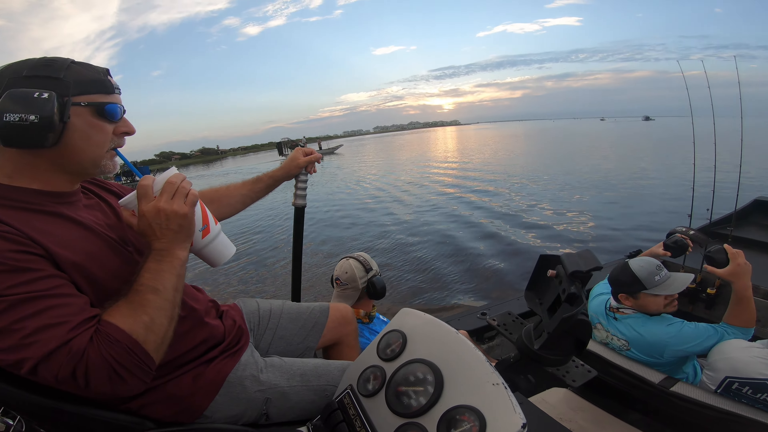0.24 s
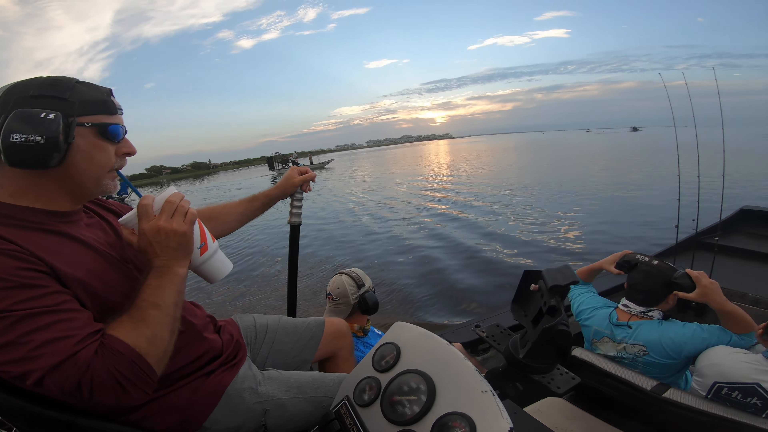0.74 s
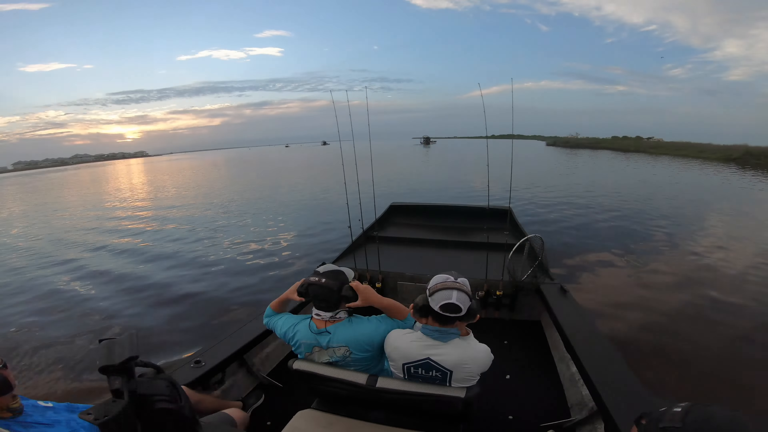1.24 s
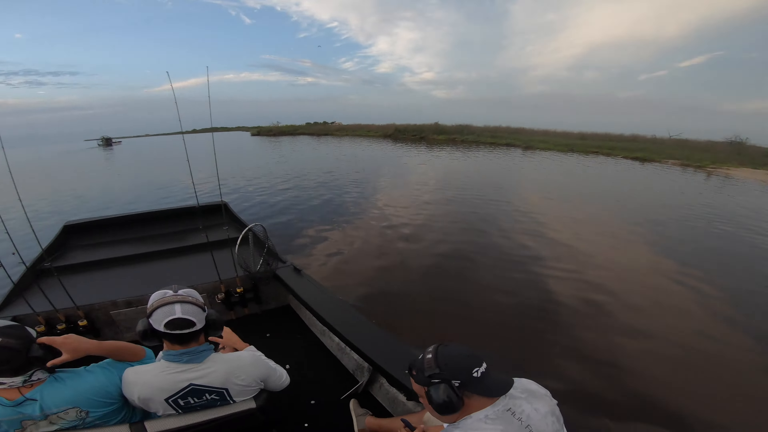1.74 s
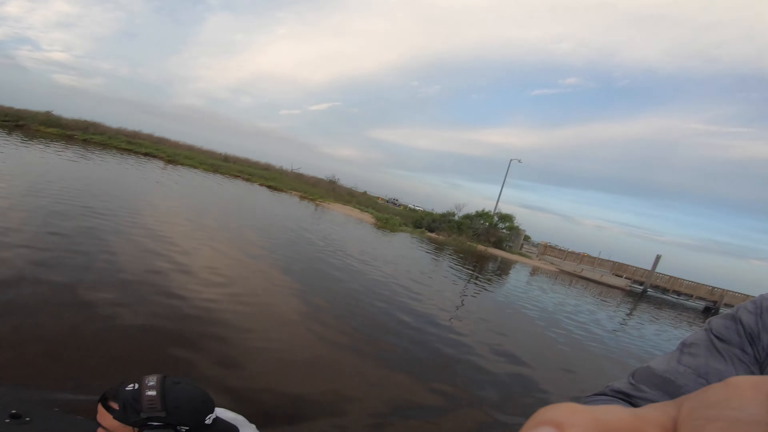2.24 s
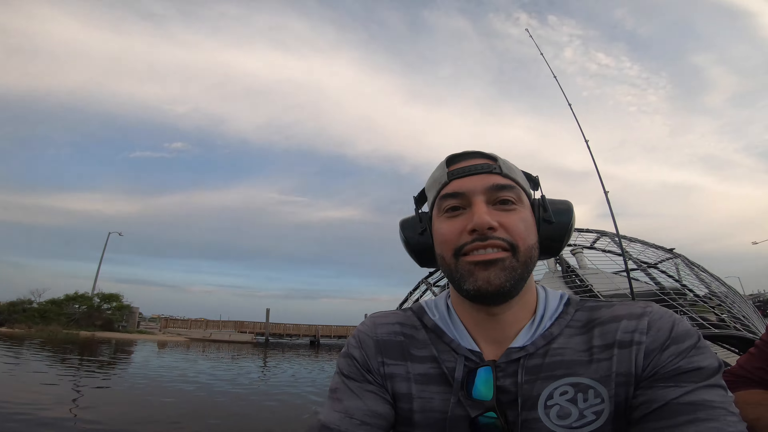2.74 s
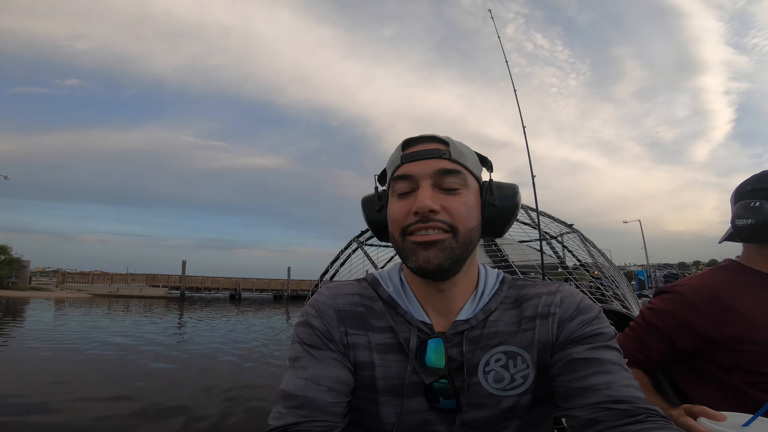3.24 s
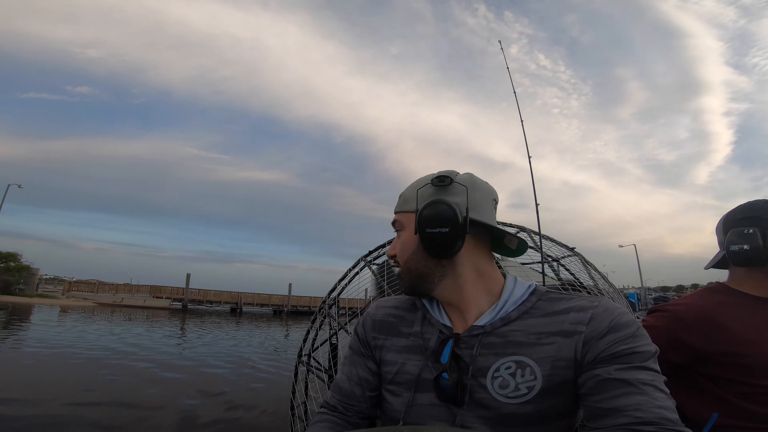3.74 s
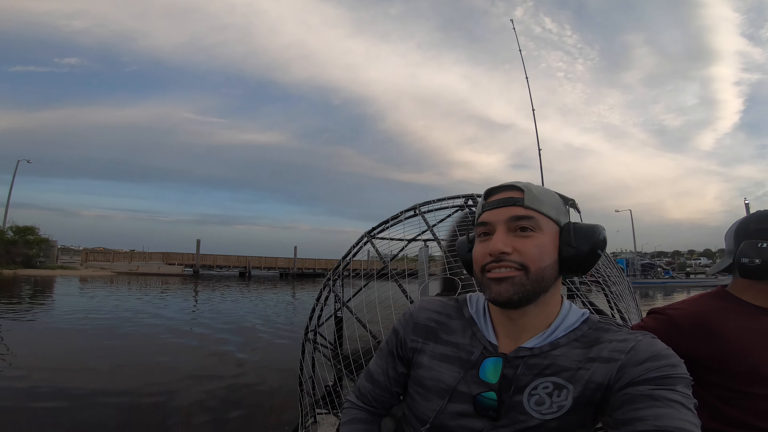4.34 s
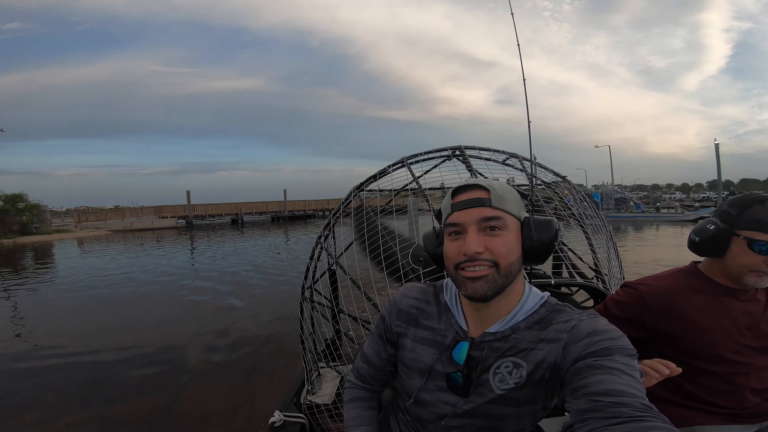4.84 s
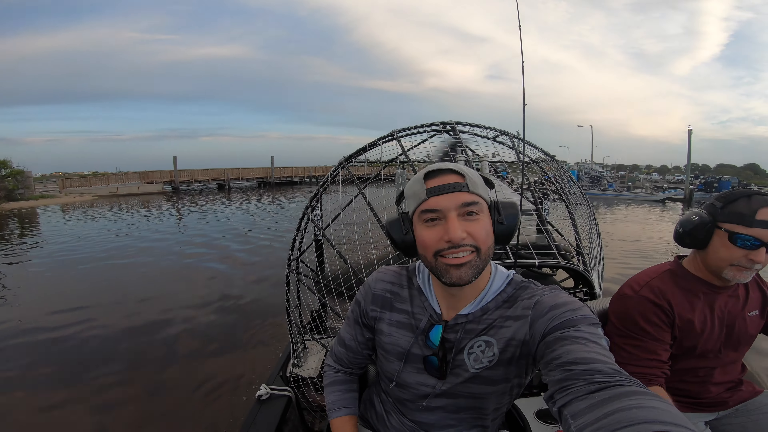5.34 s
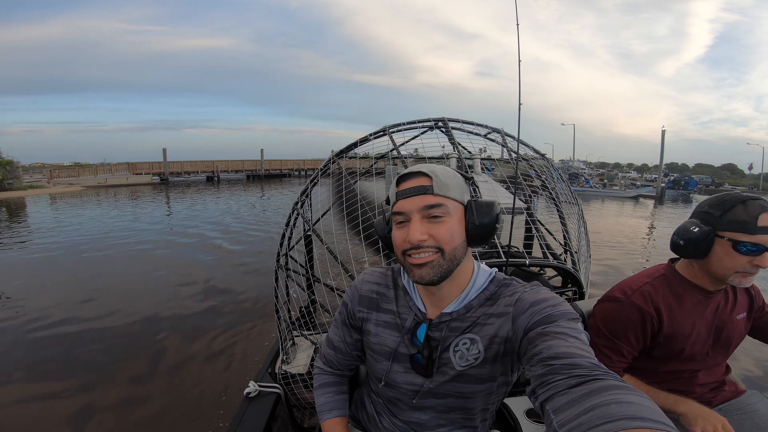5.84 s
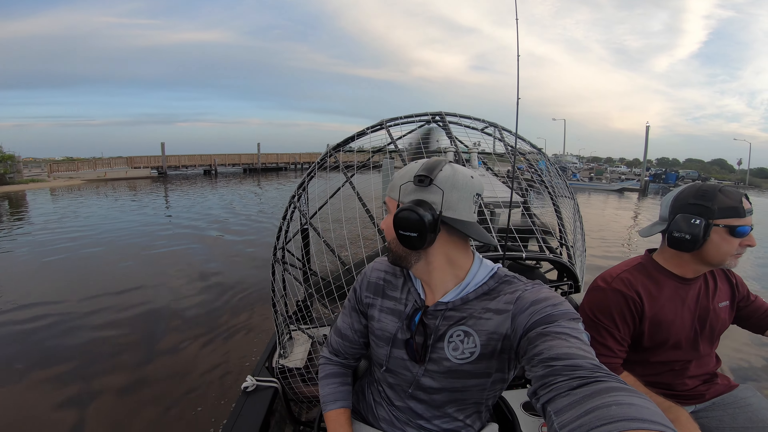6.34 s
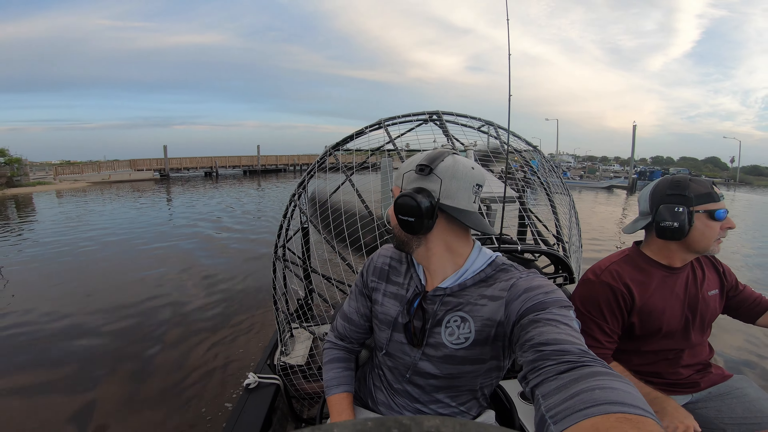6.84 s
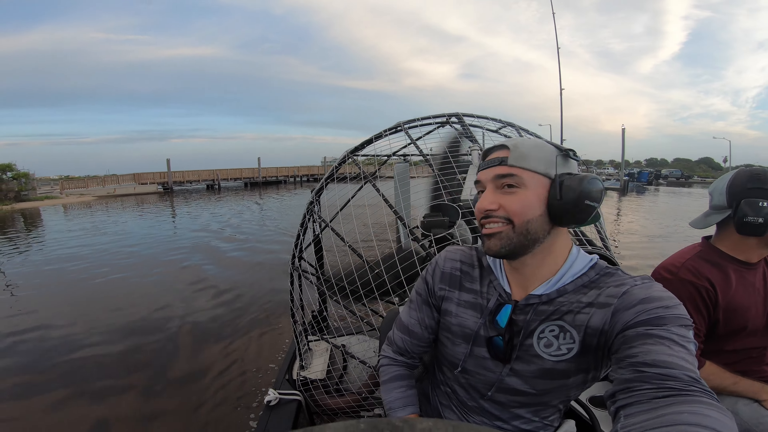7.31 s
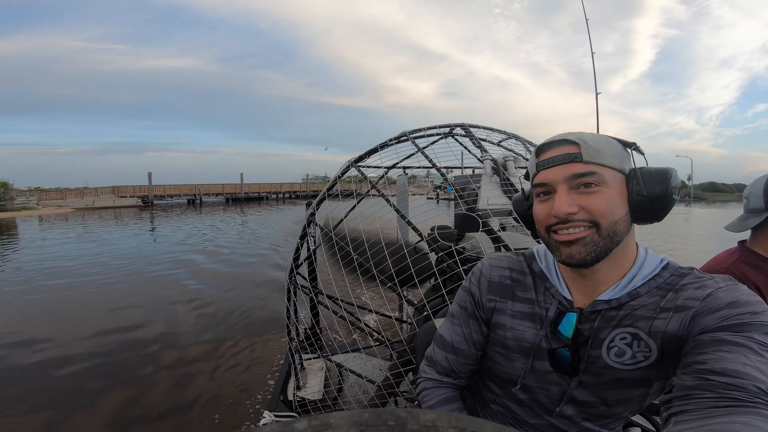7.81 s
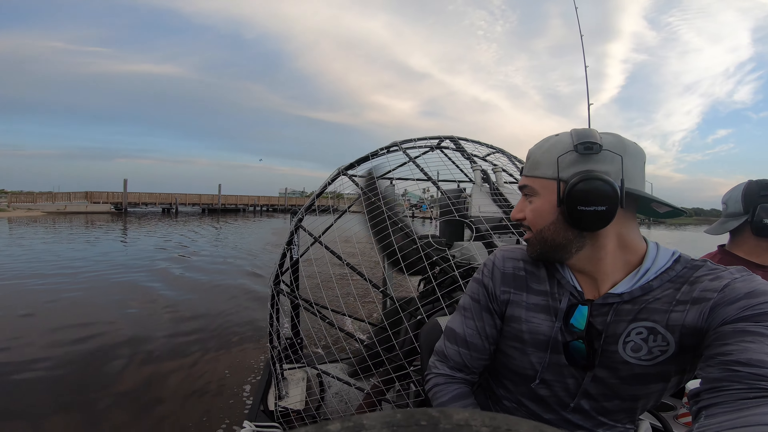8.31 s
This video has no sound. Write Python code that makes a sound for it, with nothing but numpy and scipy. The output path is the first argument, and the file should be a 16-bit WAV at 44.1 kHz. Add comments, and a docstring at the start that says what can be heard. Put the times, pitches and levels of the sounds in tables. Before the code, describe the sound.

Close, dry outdoor stereo from an airboat seat: a continuous low engine hum, burbling exhaust and fast fluttering propeller thuds, with no real change of speed. Over them, a breathy, high whistle flares twice per propeller turn, mostly sliding down. As the handheld microphone turns, the whistle leans right, dulls briefly behind the holder's body, then returns with brighter hiss facing the propeller. One tiny tap on the camera case.

```python
"""Airboat cruising over calm water

Heard from the seats by a hand-held camera that swings from the port side past the bow to face the stern.
The V8 exhaust is a drone of sine lines over pulsing rumble; the geared-down four-blade propeller
adds thudding sine lines and chopped noise. One blade whistles: a hoarse gliding tone, mostly falling in
pitch, flares twice a turn. Bands of noise give the air, engine and cage hiss; a finger taps the case once."""
import sys
import numpy as np
from scipy import signal
from scipy.fft import rfft, irfft, next_fast_len
from scipy.io import wavfile
from scipy.ndimage import map_coordinates

SR = 44100
rng = np.random.default_rng(int(sys.argv[2]) if len(sys.argv) > 2 else 0)


def master_out(mix):
    """Clip the mix to full scale and print it as 16-bit PCM to the path in sys.argv[1]."""
    frames = np.transpose(np.atleast_2d(mix))
    ceiling = np.clip(frames, -1, 1)
    pcm = np.round(ceiling * 32767).astype(np.int16)
    wavfile.write(sys.argv[1], SR, pcm)


N = 377937  # length [samples]

# engine speed: (time [s], crank speed [revolutions per minute])
ENGINE_SPEED = [(0, 1425), (1.2, 1429.5), (2.5, 1427), (3.3, 1434), (6.6, 1438), (7.3, 1451), (8.57, 1441)]
GEAR_RATIO = 2.339  # crank turns per propeller turn
# where the camera points: (time [s], bearing of the stern leftwards from the lens [degrees],
# share of the propeller hidden by the holder's body [0-1])
CAMERA_SWING = [(0, 80, 0), (.85, 100, 0), (1.45, 182, 0), (2.3, 262, 0), (2.75, 300, .7), (3.9, 325, 1),
                (5.35, 343, 0), (8.57, 343, 0)]
# how alike left and right are in the noises: (frequency [Hz], correlation [-1 to 1])
STEREO_LIKENESS = [(30, 0.28), (100, 0.71), (350, 1), (700, 0.77), (1300, 0.44), (2800, 0.86), (4000, 1),
                   (5000, 0.68), (6500, 0.18), (8300, 0.14), (10000, 0.08), (14000, 0.18)]

# exhaust lines beside the firing note, before surging: (multiple of crank speed [ratio], level [dB])
EXHAUST_LINES = [(2.5, -50), (3.5, -59), (4.5, -32), (5, -44), (5.5, -40), (6.5, -42.5), (7, -33),
                 (7.5, -43), (8, -36.5), (8.5, -38), (9.5, -42), (11, -44), (12.5, -45), (14.5, -46.5),
                 (15.5, -42.5)]
# exhaust line at 12 per crank turn: (time [s], level [dB])
BLARE_LEVEL = [(0, -41), (.55, -33), (.8, -40), (1.4, -39), (1.75, -33.5), (2.2, -35.5), (3.35, -30.5),
               (4.08, -44), (4.3, -24.5), (4.52, -38), (4.64, -28), (5.4, -28.5), (5.8, -32), (6.15, -38),
               (6.35, -30), (7.1, -32), (7.35, -40), (8.1, -38), (8.42, -30.5)]
# exhaust line at 10.5 per crank turn: (time [s], level [dB])
GROWL_LEVEL = [(0, -38), (.65, -33), (1.2, -39), (2.9, -37), (4, -45), (5.3, -39), (5.6, -33.5),
               (6.45, -33.5), (7, -44), (7.45, -33.5), (8.5, -30.5)]
# colour of the exhaust rumble: (frequency [Hz], relative density [dB per Hz])
RUMBLE_SPECTRUM = [(15, -48), (30, -36), (55, 0), (80, 4.5), (130, -7), (180, -2.5), (300, -8), (500, -24),
                   (900, -60)]

# propeller lines, before they follow the chop: (multiple of blade rate [ratio], level [dB])
BLADE_LINES = [(1, -40.5), (2, -38.5), (3, -38.5), (4, -40), (5, -43.5), (6, -41.5), (8, -40), (9, -44.5),
               (10, -42.5), (11, -42.5), (12, -48), (13, -46.5), (14, -49), (15, -48.5), (16, -52)]
# the propeller's chop: (time [s], level [dB])
CHOP_LEVEL = [(0, -27), (.6, -26), (1.15, -30.5), (1.8, -27), (2.3, -29), (2.8, -26.5), (3.35, -27.5),
              (3.95, -30.5), (4.45, -30), (4.68, -24.5), (4.9, -31), (5.5, -26), (5.85, -28), (6.45, -27),
              (7.1, -28), (8.4, -26.5)]
# colour of the chop: (frequency [Hz], relative density [dB per Hz])
CHOP_SPECTRUM = [(90, -48), (160, 6.5), (260, -1), (400, 1.5), (600, -3.5), (900, -13), (1500, -29.5),
                 (4000, -54)]

# colour of the air through the cage: (frequency [Hz], relative density [dB per Hz])
RUSH_SPECTRUM = [(300, -38), (650, 4.5), (950, 1), (1300, 0), (1900, -4.5), (2800, -10), (4000, -26),
                 (7000, -56)]
# colour of the engine hiss: (frequency [Hz], relative density [dB per Hz])
HISS_SPECTRUM = [(1000, -20), (2000, 1.5), (3000, 5.5), (3700, 4.5), (4400, 1), (5500, -3.5), (8000, -42)]
# colour of the blade edges' fizz: (frequency [Hz], relative density [dB per Hz])
FIZZ_SPECTRUM = [(2500, -34), (4300, -3), (5200, 1), (6300, 3), (7200, 0.5), (8100, -3.5), (9000, -2.5),
                 (10100, -3.5), (11000, -9.5), (12000, -18), (14200, -19)]

# Doppler glide of the whistling blade, before it wavers: (position [turns], pitch [Hz])
WHISTLE_GLIDE = [(0, 8400), (.17, 10400), (.25, 8900), (.32, 8450), (.39, 8220), (.46, 7950), (.56, 7550),
                 (.68, 7250), (.82, 7020), (1, 7050)]
# the glide comes earlier in the turn as the swing carries the camera round the hub
GLIDE_START_TURNS, GLIDE_TURNS_PER_DEGREE = .2, -.00048
# depth of the whistle's wander in level and pitch, and of the faster waver from turbulence
WANDER_DB, WANDER_HZ, WAVER_HZ = 1.0, 110, 110
# the whistle flares as the blade comes and as it goes: (time [s], coming left [dB], coming right [dB],
# going left [dB], going right [dB], crest of the going flare [turns])
WHISTLE_FLARES = [(0, -41.5, -41.5, -35.2, -36.7, .6), (.85, -41, -40.5, -35, -37, .6),
                  (1.15, -37, -33.5, -39, -36, .6), (1.45, -38, -31.8, -44.5, -41, .7),
                  (1.95, -40.5, -29.8, -44.5, -34, .75), (2.35, -39.5, -30.3, -45, -41, .73),
                  (2.65, -39.5, -39, -45.5, -43.5, .7), (3, -41.5, -46, -46.5, -45.5, .69),
                  (3.7, -43, -45, -45, -42, .69), (4.3, -42.5, -44.5, -39.5, -35.5, .71),
                  (4.65, -40, -42.5, -40, -35.5, .71), (5.1, -37, -39.5, -36.2, -37.8, .69),
                  (6.3, -36.8, -37, -36.2, -37.8, .69), (7.3, -38, -39, -37.5, -38, .69),
                  (8, -39.5, -40, -40, -36, .69), (8.57, -43, -40.5, -39.5, -37, .69)]
COMING_CREST_TURNS, COMING_RISE_TURNS, COMING_FALL_TURNS = .39, .115, .15
GOING_RISE_TURNS, GOING_FALL_TURNS = .23, .13
# share of each flare common to both ports, and what the stern's lying ahead adds for the coming one
COMING_SHARE, COMING_SHARE_AHEAD, GOING_SHARE = .28, .14, .7
COMING_LAG = 3  # the coming flare reaches the right port later [samples]
# the camera's ports pass less of the top of the glide: (frequency [Hz], gain [dB])
PORT_DIP = [(8400, 0), (9100, -11), (10500, -13), (11500, -20)]
# colour of the broad swish just ahead of the coming flare: (frequency [Hz], relative density [dB per Hz])
SWISH_SPECTRUM = [(5200, -20), (6700, 0), (8400, -1), (10200, -5), (11300, -26)]
SWISH_DB, SWISH_LEAD_TURNS = -10.5, .06  # gain on top of the coming flare's level, and lead
# colour of the sizzle of two opposite blades: (frequency [Hz], relative density [dB per Hz])
SIZZLE_SPECTRUM = [(8300, -25), (9500, -2), (10200, 0), (10900, -9), (11600, -25)]
SIZZLE_TURNS = .35  # first of its two crests in the turn

# cage hiss as the camera swings: (time [s], level [dB], left over right [dB])
CAGE_HISS = [(0, -46.5, -.5), (.6, -45.5, .5), (1.1, -46, -2.5), (1.55, -45, -5), (2, -45.5, -10),
             (2.7, -46.5, -2.5), (3.4, -47.5, -1), (4.1, -50, -.5), (5.3, -50.3, 3), (7, -50.3, 3),
             (8.57, -52, 0)]
# a finger brushes the camera: (time [s], starting level [dB], time to fall 60 dB [s])
FINGER_TAP = (2.423, -30.5, .09)
# colour of the camera's case when touched: (frequency [Hz], relative density [dB per Hz])
CASE_SPECTRUM = [(300, -10), (800, 7), (1700, 7), (2800, -1), (4700, 0), (6500, -8), (10000, -28)]
TOP_HZ = 14400  # upper band limit


def amp(db):
    """Decibels to gain."""
    return 10 ** (np.asarray(db) / 20)


def unit(x):
    """Scale to rms 1."""
    return x / np.sqrt(np.mean(x ** 2) + 1e-20)


def along(points, hz):
    """Read a (frequency, value) table on a log frequency axis."""
    f, v = np.transpose(points)
    return np.interp(np.log(hz + 1), np.log(f + 1), v)


def curves(rows):
    """One value per sample for each column after the time."""
    s, *columns = np.transpose(rows)
    return [np.interp(np.arange(N) / SR, s, column) for column in columns]


def wobble(rate):
    """A smooth random curve with rate knots a second."""
    coarse = np.linspace(0, N * rate / SR, N // 20)
    knots = rng.standard_normal(N // 20)
    smooth = map_coordinates(knots, [coarse])
    return np.interp(np.arange(N) * rate / SR, coarse, smooth)


def filtered(x, response):
    """Shape x by a gain that depends on frequency."""
    m = next_fast_len(N + SR // 2)
    return irfft(rfft(x, m) * response(np.fft.rfftfreq(m, 1 / SR)), m)[..., :N]


def panned(x, pan_db):
    """Make the left side louder than the right by pan_db."""
    return x * amp(np.array([[1], [-1]]) * pan_db / 2)


def air(spectrum):
    """Stereo noise of rms 1; the mix of mid and side sets how alike the ears are at each frequency."""
    def mid_side_gains(hz):
        turn = np.arccos(np.clip(along(STEREO_LIKENESS, hz), -1, 1)) / 2
        return amp(along(spectrum, hz)) * [np.cos(turn), np.sin(turn)]

    mid, side = filtered(rng.standard_normal((2, N)), mid_side_gains)
    return unit(np.array([mid + side, mid - side]))


def puffs(cycles, depth_db, scatter_db):
    """A gain of rms 1 that swells once a cycle, each time to a new height."""
    size_db = scatter_db * rng.standard_normal(SR)[cycles.astype(int)]
    return unit(amp((depth_db + size_db) * np.sin(np.pi * cycles) ** 2))


def lines(table, cycles, unsteady, rate):
    """Sine lines at multiples of a rotation, each wavering in strength and phase."""
    total = np.zeros(N)
    for multiple, db in table:
        order = np.round(2 * multiple) / 2  # whole and half orders only
        angle = 2 * np.pi * (order * cycles + rng.random())
        in_step = (1 + unsteady * wobble(rate)) * np.sin(angle)
        out_of_step = unsteady * wobble(rate) * np.cos(angle)
        total += amp(db) * (in_step + out_of_step)
    return total * np.sqrt(2)


def flare(turns, crest, rise, fall):
    """A gain that swells to 1 and fades once a turn."""
    off = (turns - crest + .5) % 1 - .5
    return np.exp(-(off / np.where(off < 0, rise, fall)) ** 2)


def pose():
    """How far the stern lies ahead (-1 to 1) and to the left (-1 to 1), and how much of it is hidden."""
    degrees, hidden = curves(CAMERA_SWING)
    return np.cos(np.radians(degrees)), np.sin(np.radians(degrees)), hidden


def pickup(db, ahead_db, left_db, hidden_db=0):
    """A level in dB, changed by the way the camera points and by the body in between."""
    ahead, left, hidden = pose()
    return db + ahead_db * ahead + left_db * left + hidden_db * hidden


def ports(x, shade_db, lag):
    """The port nearer the stern hears it earlier by up to lag samples, and louder by up to shade_db."""
    left = pose()[1]
    shifted = [map_coordinates(ear, [np.arange(N) + sign * lag * left / 2], order=3)
               for ear, sign in zip(x, (1, -1))]
    return panned(np.array(shifted), shade_db * left)


def exhaust(crank):
    """Four firings a revolution drone; unequal cylinders add half orders and a rough, uneven rumble."""
    firing = crank * 4
    drone = np.sqrt(2) * amp(-14.0 + 0.17 * wobble(13)) * np.sin(2 * np.pi * firing)
    blare = amp(curves(BLARE_LEVEL)[0]) * lines([(12, 0)], crank, unsteady=.28, rate=9)
    growl = amp(curves(GROWL_LEVEL)[0]) * lines([(10.5, 0)], crank, unsteady=.5, rate=8)
    surge = unit(amp(1.2 * wobble(22)))
    burble = surge * lines(EXHAUST_LINES, crank, unsteady=0.24, rate=9)
    pulses = puffs(firing, depth_db=11.0, scatter_db=0.5)
    rumble = amp(-28.5) * surge * air(RUMBLE_SPECTRUM) * pulses
    engine = drone + blare + growl + burble + rumble
    return ports(panned(engine, pan_db=-.55), shade_db=.3, lag=16)


def propeller(passes):
    """Each blade thuds through the engine's wake and sheds a puff of turbulence."""
    chop_db, = curves(CHOP_LEVEL)
    thud_gain = amp(.5 * (chop_db - chop_db.mean()))  # follows the chop at half its range
    thud = thud_gain * lines(BLADE_LINES, passes, unsteady=.4, rate=7)
    throb = puffs(passes, depth_db=2.6, scatter_db=1.2)
    chop = amp(chop_db + 0.25 * wobble(9.8)) * air(CHOP_SPECTRUM) * throb
    return ports(thud + panned(chop, pan_db=-0.3), shade_db=0.5, lag=4.7)


def slipstream(passes):
    """Air rushes through the cage, the engine hisses and the blade edges fizz, all pulsing with the blades."""
    flutter = puffs(passes, depth_db=.7, scatter_db=1.4)
    rush_db = pickup(-34.0, ahead_db=1.4, left_db=1.5, hidden_db=-1.85) + 0.45 * wobble(12)
    rush = amp(rush_db) * air(RUSH_SPECTRUM) * flutter
    hiss_db = pickup(-40.5, ahead_db=3.0, left_db=1.5, hidden_db=-3.0) + 0.15 * wobble(11)
    hiss_pulse = puffs(2 * passes, depth_db=1.0, scatter_db=1.3)
    hiss = amp(hiss_db) * air(HISS_SPECTRUM) * hiss_pulse
    fizz_db = pickup(-42.0, ahead_db=0.5, left_db=0.5, hidden_db=-4.0) + 0.2 * wobble(6.0)
    fizz = amp(fizz_db) * air(FIZZ_SPECTRUM) * flutter
    placed_rush = ports(panned(rush, pan_db=-3), shade_db=8, lag=5)
    placed_hiss = ports(panned(hiss, pan_db=0.5), shade_db=5, lag=2.85)
    placed_fizz = ports(panned(fizz, pan_db=-1.5), shade_db=2.5, lag=2.66)
    return placed_rush + placed_hiss + placed_fizz


def breathy(hz, share, halo_db, halo_hz):
    """A wavering tone in a halo of noise; a share is the same at both ports, the rest is scattered."""
    waver = WAVER_HZ * np.array([wobble(500) for path in range(3)])
    angle = 2 * np.pi * np.cumsum(hz + waver, axis=1) / SR
    # slow noise on the tone's two phases makes a noise band around its pitch
    a, b = filtered(rng.standard_normal((2, 3, N)), lambda f: 1 / (1 + (f / halo_hz) ** 4))
    halo = unit(a * np.cos(angle) + b * np.sin(angle))
    direct, *scattered = unit(unit(np.sin(angle)) + amp(halo_db) * halo)
    return np.sqrt(share) * direct + np.sqrt(1 - share) * np.array(scattered)


def deck(x, t60):
    """The cage and deck scatter a sound into a very short tail, different at each port."""
    t = np.arange(SR // 8) / SR
    tail = rng.standard_normal((2, len(t))) * amp(-60 * t / t60)
    return signal.fftconvolve(x, tail / np.linalg.norm(tail[0]), axes=1)[:, :N]


def whistle(turns):
    """One blade tip's tone glides as it passes: a high, hoarse flare coming, a lower, purer one going."""
    degrees = curves(CAMERA_SWING)[0]
    *levels_db, going_crest = curves(WHISTLE_FLARES)
    coming_gain, going_gain = amp(levels_db[:2]), amp(levels_db[2:])
    blade = turns - GLIDE_START_TURNS - GLIDE_TURNS_PER_DEGREE * degrees
    hz = np.interp(blade % 1, *np.transpose(WHISTLE_GLIDE)) + WANDER_HZ * wobble(45)

    coming_share = COMING_SHARE + COMING_SHARE_AHEAD * pose()[0]
    coming = breathy(hz, coming_share, halo_db=2, halo_hz=650)
    coming = np.array([coming[0], np.roll(coming[1], COMING_LAG)])
    going = ports(breathy(hz, GOING_SHARE, halo_db=-1, halo_hz=420), shade_db=0, lag=2.8)
    coming_flare = flare(blade, COMING_CREST_TURNS, COMING_RISE_TURNS, COMING_FALL_TURNS)
    going_flare = flare(blade, going_crest, GOING_RISE_TURNS, GOING_FALL_TURNS)
    tone = coming_gain * coming * coming_flare + going_gain * going * going_flare
    heard = filtered(tone, lambda f: amp(along(PORT_DIP, f)))
    heard = heard + amp(-12) * deck(heard, t60=.06)

    swish_flare = flare(blade, COMING_CREST_TURNS - SWISH_LEAD_TURNS, rise=.12, fall=.14)
    swish = amp(SWISH_DB) * coming_gain * air(SWISH_SPECTRUM) * swish_flare
    sizzle_flare = flare(2 * (blade - SIZZLE_TURNS), 0, rise=.27, fall=.27)  # twice a turn
    sizzle_db = pickup(-53, ahead_db=-1, left_db=0, hidden_db=-3)
    sizzle = amp(sizzle_db) * air(SIZZLE_SPECTRUM) * sizzle_flare
    return amp(WANDER_DB * wobble(40)) * (heard + swish + panned(sizzle, pan_db=-4))


def cage(hz, width_hz):
    """A thin band of hiss from air drawn across the guard's wires, clearest with the stern behind the lens."""
    level_db, pan_db = curves(CAGE_HISS)
    noise = rng.standard_normal((3, N))
    direct, *scattered = filtered(noise, lambda f: np.exp(-((f - hz) / width_hz) ** 2))
    band = ports(direct + np.array(scattered), shade_db=0, lag=2.9)
    return panned(amp(level_db + 1.2 * wobble(16)) * unit(band), pan_db)


def tap():
    """A finger brushes the camera's case: a faint, decaying tick of noise with a hollow body."""
    s, db, t60 = FINGER_TAP
    age = np.arange(N) / SR - s
    decay = amp(db - 60 * np.abs(age) / t60) * (age > 0)
    return panned(decay * air(CASE_SPECTRUM), pan_db=-6)


def scene():
    """One crankshaft times engine and blades, the propeller through its reduction gear."""
    rpm, = curves(ENGINE_SPEED)
    crank = np.cumsum(rpm) / 60 / SR  # revolutions so far
    turns = crank / GEAR_RATIO
    passes = turns * 4  # four blades
    machine = exhaust(crank) + propeller(passes) + slipstream(passes) + whistle(turns)
    return machine + cage(hz=7300, width_hz=680) + tap()


def record(dry):
    """The camera rounds off the tallest peaks, sheds the deepest bass and keeps nothing above its band limit."""
    rounded = dry / (1 + np.abs(dry / .66) ** 8) ** (1 / 8)
    return filtered(rounded, lambda hz: (hz < TOP_HZ) / np.sqrt(1 + (27 / (hz + 1)) ** 8))


dry = scene()
out = record(dry)
master_out(out)
```